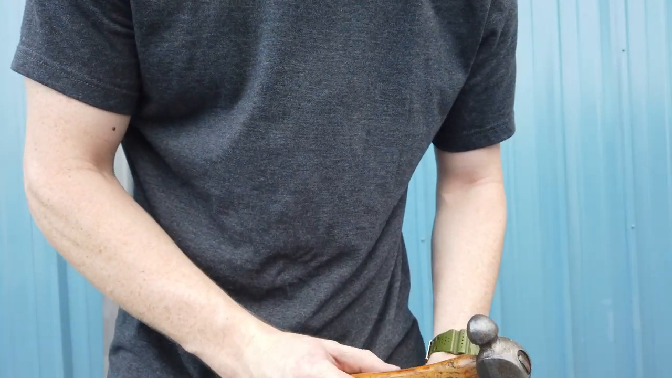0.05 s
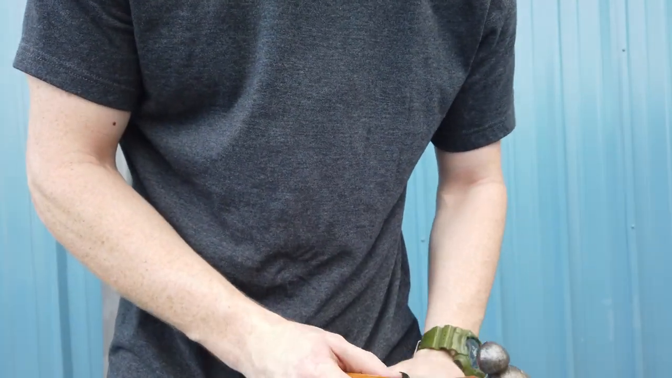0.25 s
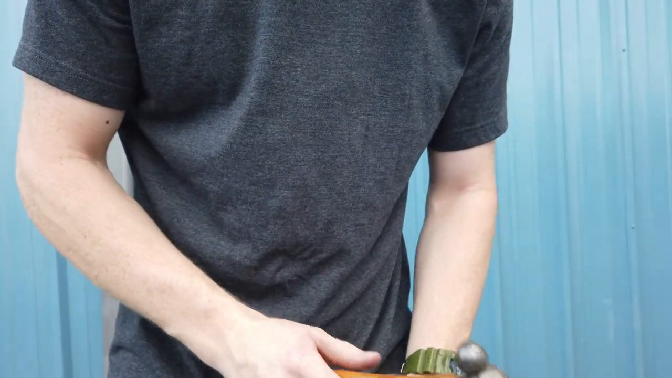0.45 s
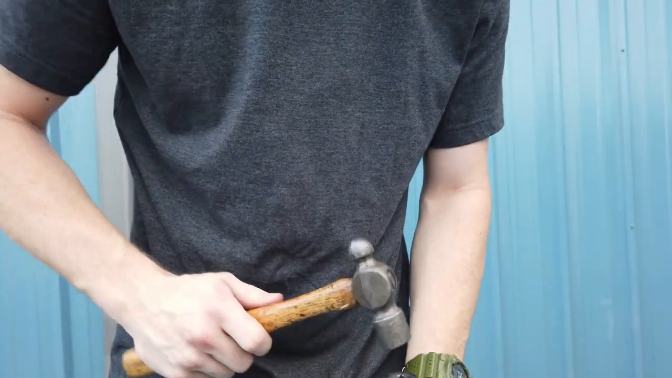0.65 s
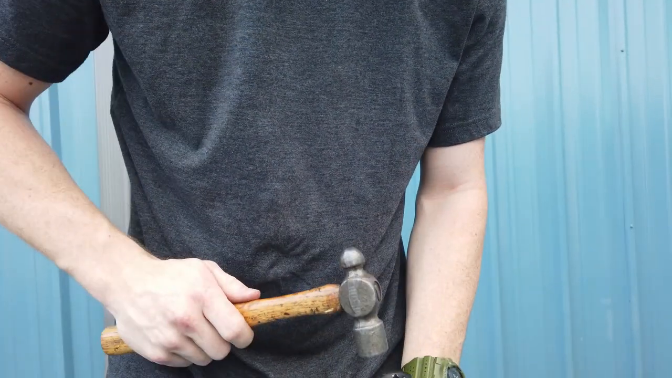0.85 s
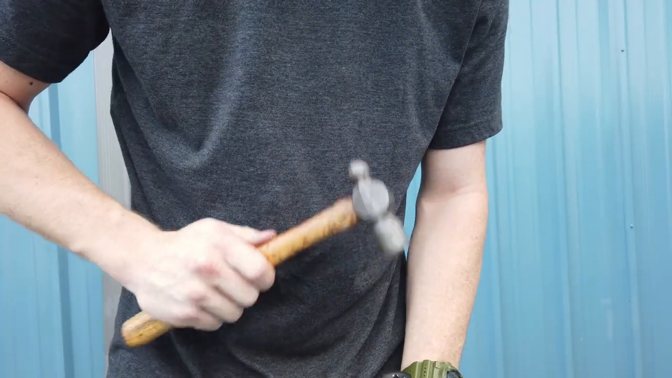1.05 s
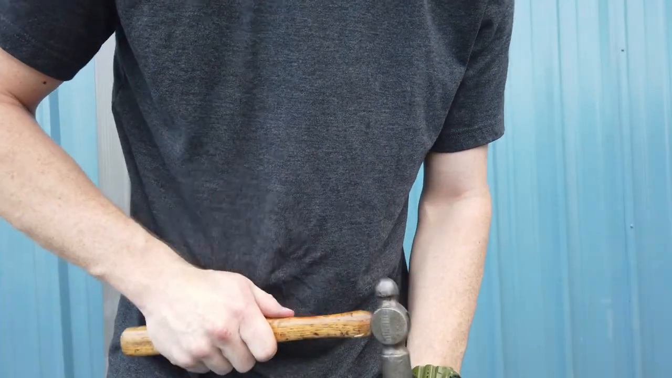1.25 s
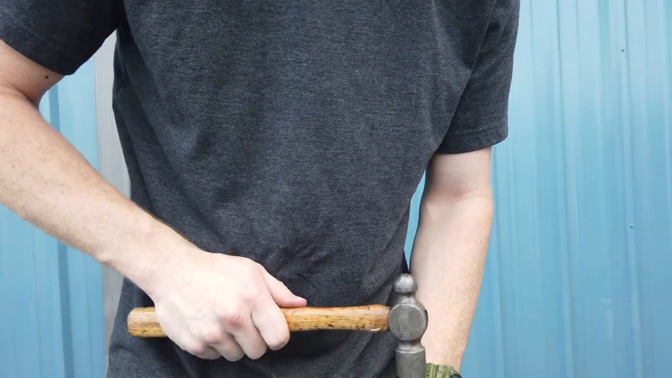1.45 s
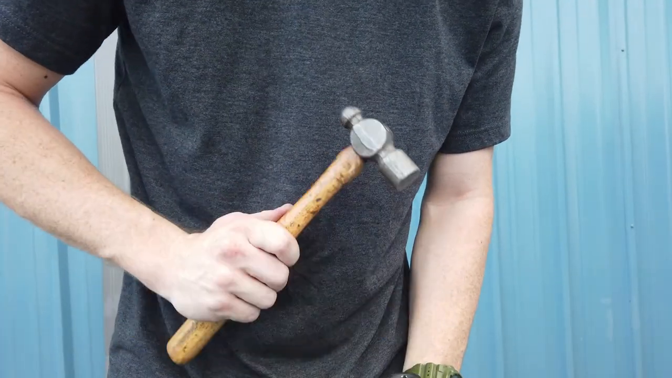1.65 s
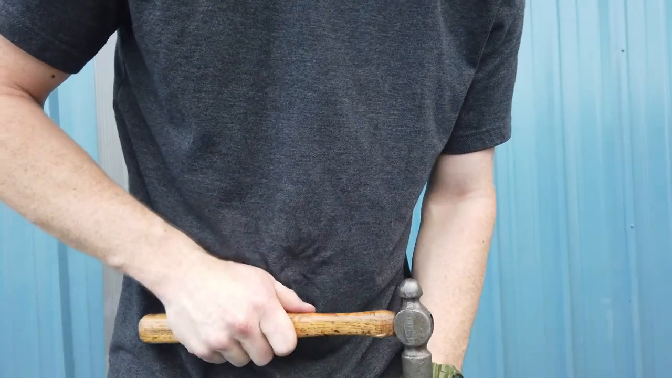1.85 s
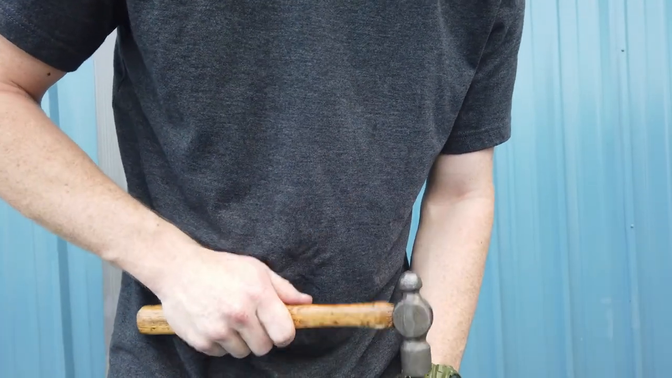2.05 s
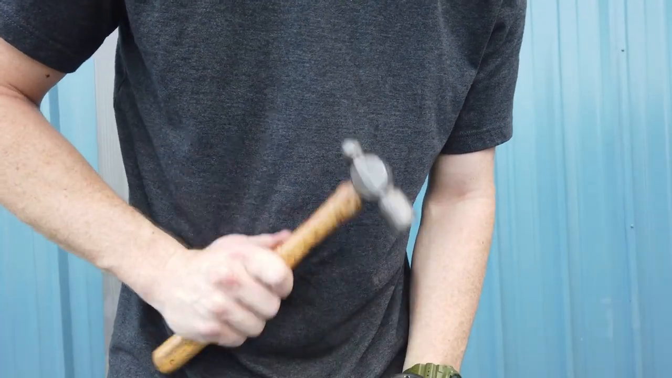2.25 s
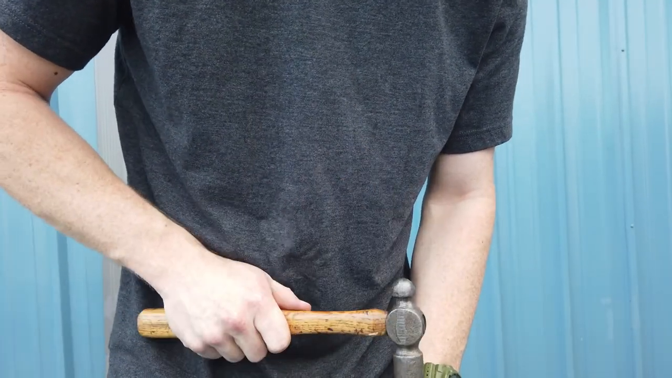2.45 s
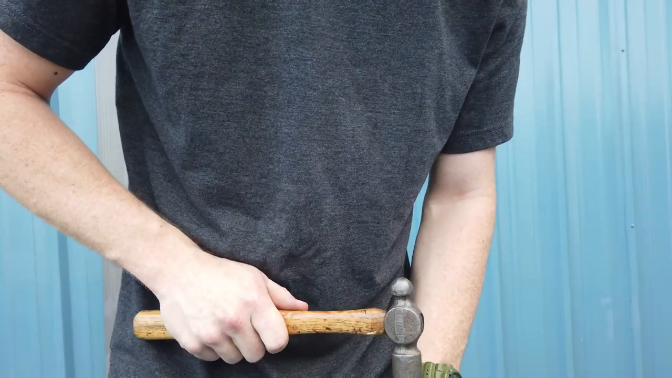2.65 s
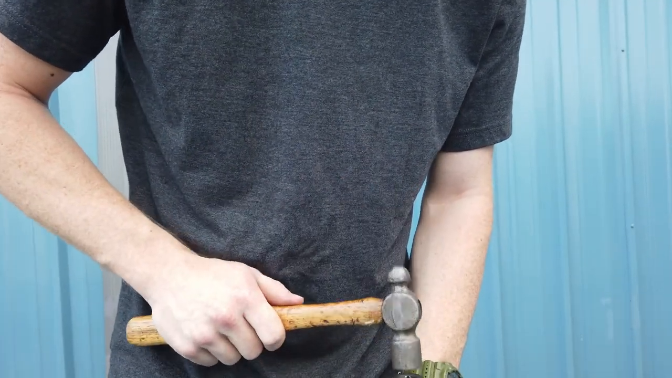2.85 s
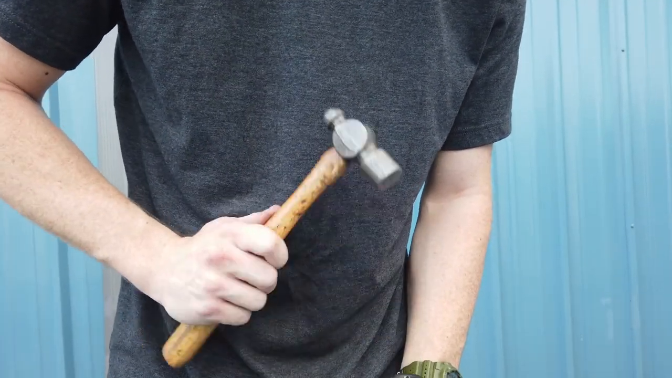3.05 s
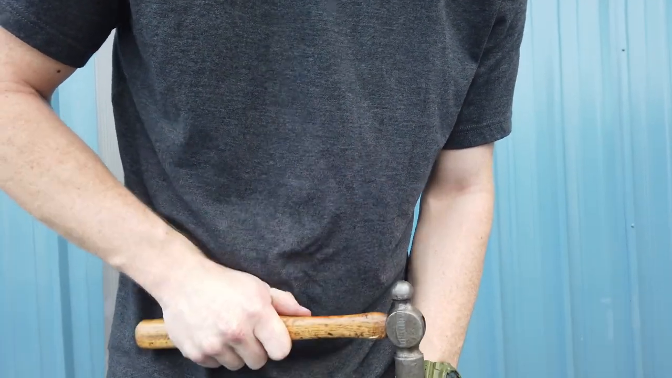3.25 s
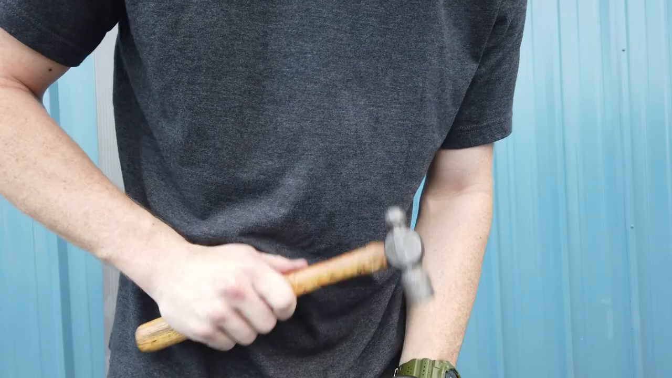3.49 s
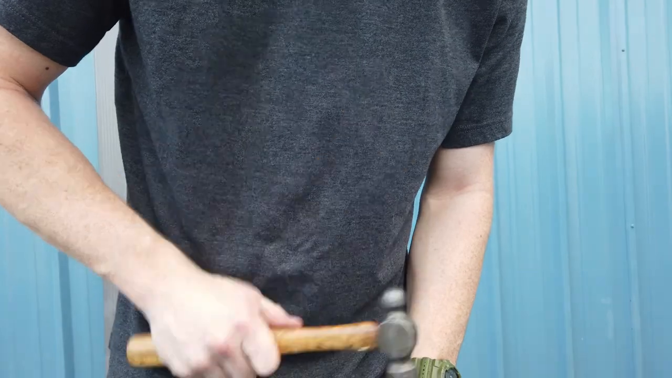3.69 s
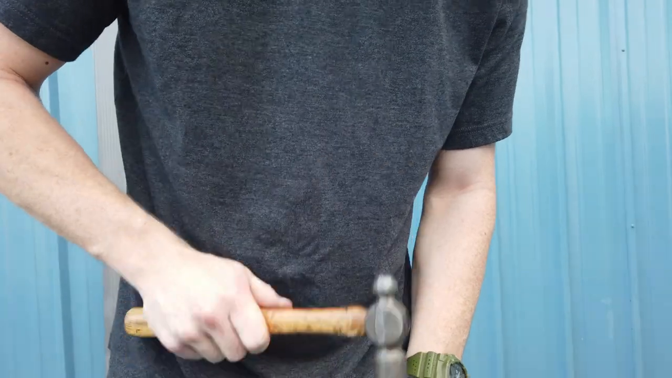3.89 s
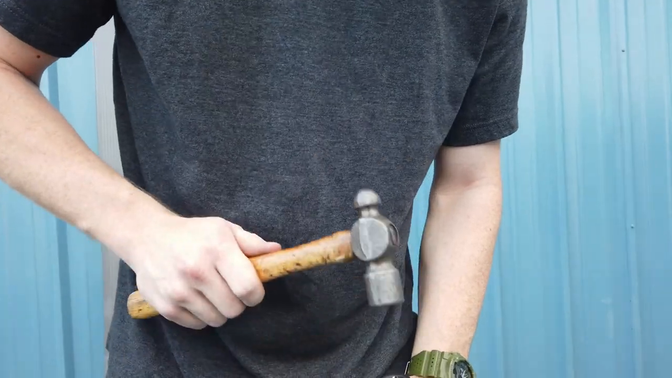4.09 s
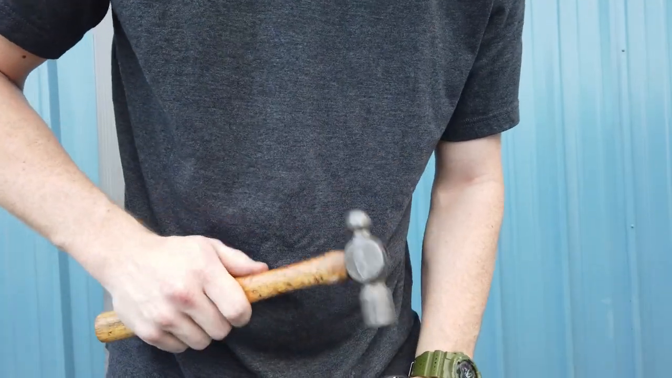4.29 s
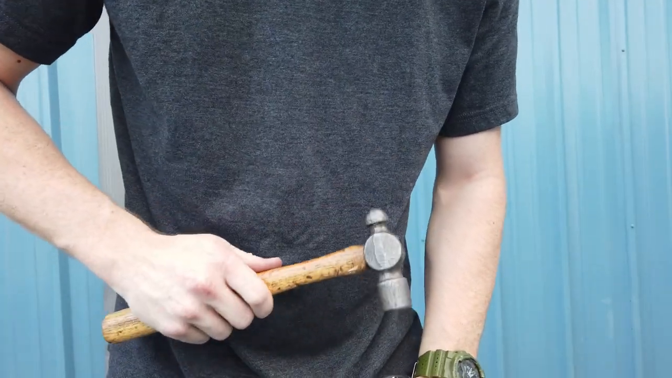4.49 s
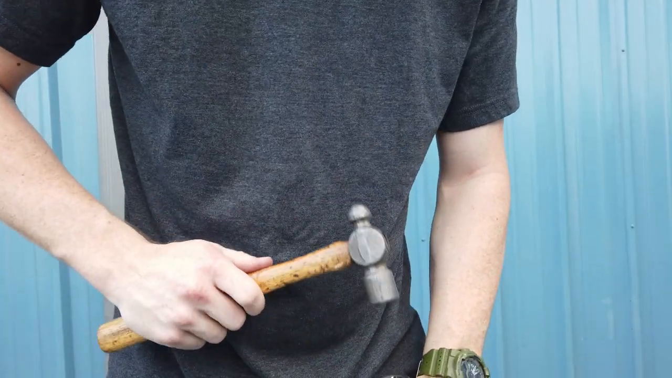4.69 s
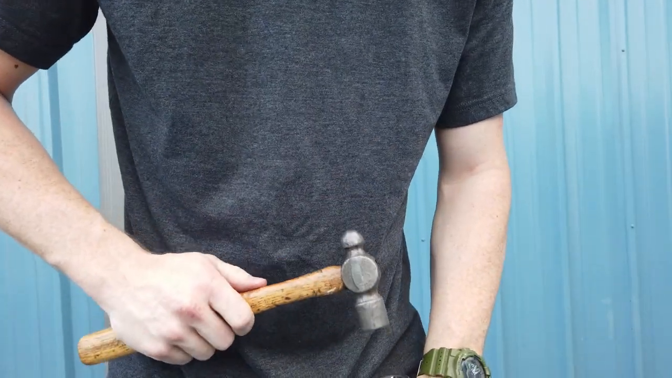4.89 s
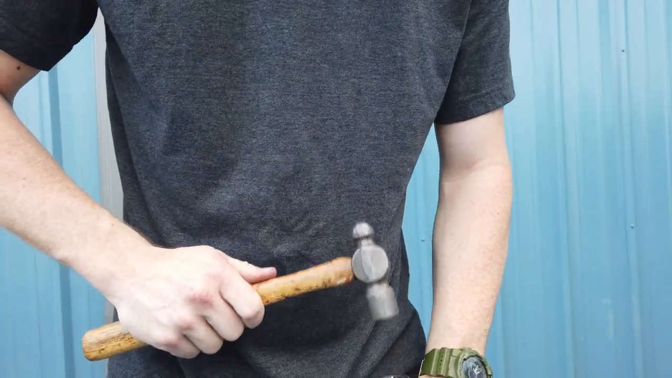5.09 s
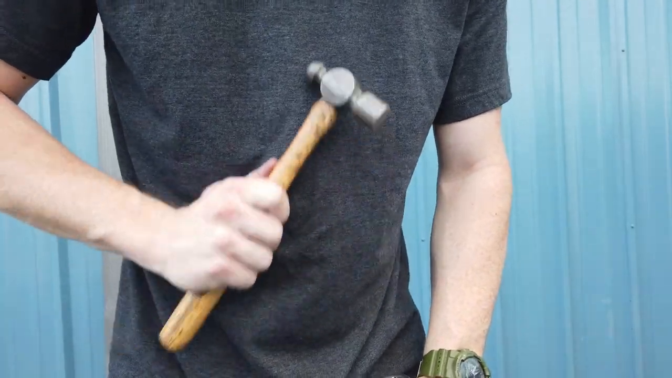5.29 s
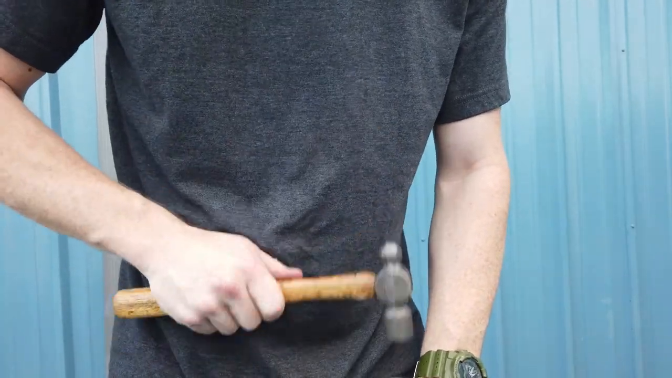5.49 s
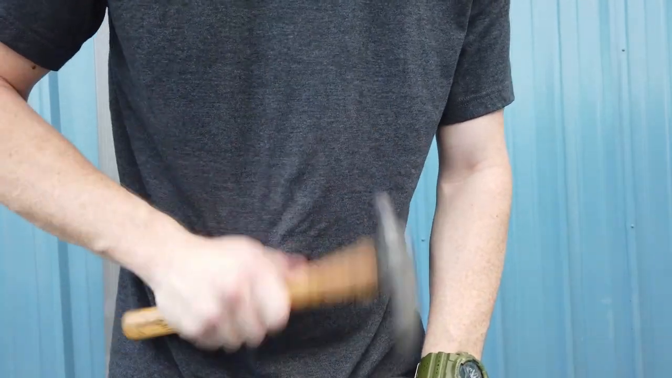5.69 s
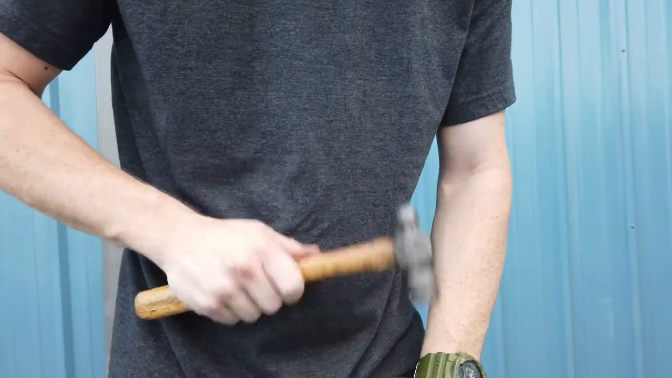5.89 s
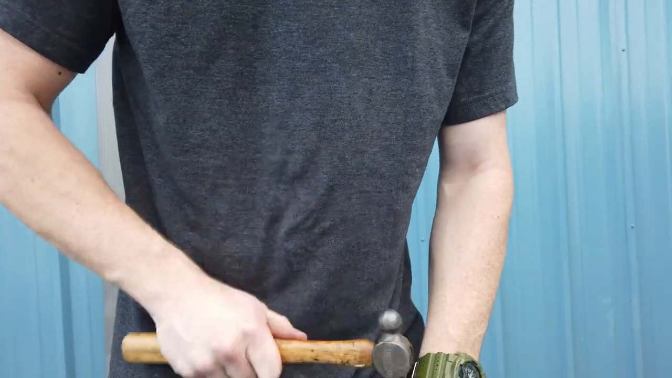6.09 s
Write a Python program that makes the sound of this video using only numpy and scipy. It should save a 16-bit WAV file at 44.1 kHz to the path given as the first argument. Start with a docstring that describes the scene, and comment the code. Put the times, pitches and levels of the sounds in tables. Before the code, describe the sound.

Small tools clink softly on a workbench, then a hammer hits a steel socket seven times, about half a second apart in three quick groups. Every bright, ringing strike makes the socket bounce and the wooden bench thump, with loose metal clattering and jingling for a moment. It is heard from nearby in a small shed with a short echo, while low electrical hum and distant outdoor rumble fill the gaps.

```python
"""A ball hammer drives a socket into a steel part on a loose bench in a metal shed.
Each of the seven blows clicks, sets the socket and hammer head ringing, and makes the socket bounce.
The bench then jumps, booms and rattles its loose parts for about a quarter second.
Small tools clink faintly before the first blow, and the walls add a short echo to tools and hammer.
Mains hum, far outdoor rumble, hiss and a thin chirr fill the pauses."""
import sys
import numpy as np
from scipy import signal
from scipy.fft import rfft, irfft, next_fast_len
from scipy.io import wavfile
from scipy.ndimage import uniform_filter1d, map_coordinates

SR = 44100
rng = np.random.default_rng(int(sys.argv[2]) if len(sys.argv) > 2 else 0)


def to_wav(sig):
    """Store sig (one row per channel, or 1-D mono) as 16-bit WAV at the path in sys.argv[1].

    Samples outside -1..1 are clipped; the rate is SR.
    """
    pcm = np.clip(np.atleast_2d(sig), -1, 1) * 32767
    pcm = np.round(pcm).astype(np.int16)
    wavfile.write(sys.argv[1], SR, pcm.T)  # frames by channels


N = 270774

# Hammer blows. Each row: start in seconds, level in dB, extra dB for the socket ring, the head ring
# and the thud, then the fade time in seconds set by the grip. A fade time is how long a 60 dB drop takes.
BLOWS = [(1.377, -10, -16.5, -24, -14.5, 0.03), (1.9145, -15.5, -12.5, -16, -4, 0.11),
         (2.457, -9.5, -16.5, -22.5, -5, 0.13), (3.305, -12, -15.5, -14, -3, 0.06),
         (3.843, -10, -11, -14.5, -9.5, 0.07), (5.509, -13.5, -19.5, -15.5, -10, 0.066),
         (5.861, -12.5, -25, -20.5, -14, 0.27)]
# The socket bouncing on the steel. Each row: start in seconds, level in dB, extra dB for the socket
# ring and the thud, then the fade time in seconds set by the grip.
BOUNCES = [(1.417, -19.5, -10, -1.5, .12), (1.4457, -30, 1, 4.5, .15), (1.9467, -29.5, -5, 7.5, .12),
           (1.9775, -29.5, -11, 0, .12), (2.1147, -39.5, -12.5, -3, .12), (2.4972, -27.5, -18.5, -7.5, .2),
           (2.5291, -29, -16.5, -1, 0.13), (2.5977, -49, -22.5, 9.5, .1), (3.347, -23, -31.5, 6, .1),
           (3.383, -34.5, -25, 8.5, .1), (3.8795, -25.5, -7.5, -2, .15), (3.902, -23.5, -23.5, 7.5, .15),
           (4.0064, -38.5, -34.5, 13.5, .15), (4.0419, -26, -36, -2, .1), (5.5297, -26, 0.5, -3, .3),
           (5.7162, -40.5, -30, -1, .15), (5.8898, -19, -5, -20, .25), (6.065, -40, -14, -5, .15)]
# The socket's tones. Each row: pitch in Hz, relative level in dB, share of SOCKET_FADE_S.
SOCKET_TONES = [(11040, -11.5, 0.59), (11200, 0, 3.2), (13800, -19.5, .4)]
# The hammer head's tones. Each row: pitch in Hz, relative level in dB, fade time in seconds
# before HEAD_FADE_SCALE shortens it.
HEAD_TONES = [(8430, -16.5, 0.073), (12020, -1, 0.19), (14700, -26, .2)]
# The tone colour of the click. Each row: frequency in Hz, gain in dB.
CLICK_COLOUR = [(500, -1.5), (2000, -5.5), (4000, 3), (9000, -3), (14000, -5), (17000, -15)]
# Resonances of the hand-damped steel part, then of free tools that ring on.
# Each row: pitch in Hz, width in Hz (narrow ones ring longer), gain in dB.
STEEL_TONES = [(3140, 150, 1.5), (5200, 180, 9), (6150, 33, 8.5), (8150, 150, 4)]
FREE_TOOL_TONES = [(2250, 1.5, 11), (4600, 4, 10), (10110, 3, 10), (10145, 3, 8), (12400, 5, 14)]

# Jolts of the bench by a blow, a landing leg or a hand. Each row: start in seconds, level in dB,
# extra dB for the boom, the loose parts and the small hardware, then seconds before it starts to fade.
JOLTS = [(0.001, -50, 4, -7.5, -19, 0.0033), (0.168, -44.5, -2.5, -20, -49, 0.01),
         (0.84, -38, -2, -10, -56.5, 0.005), (1.382, -25, -2.5, 1.5, 2, 0.05),
         (1.418, -25, -6, 4, 3.5, 0.013), (1.47, -38.5, 6, 12, 10, 0.018), (1.542, -45, 5, -3, -2, 0.017),
         (1.745, -51.5, 0.5, -8.5, -41, 0.0038), (1.916, -24.5, -6, 1, 3, 0.063),
         (1.99, -44, 1, 14, 14.5, 0.019), (2.108, -54, -1, 7.5, 9, 0.0043),
         (2.201, -52, -5, -39, -37, 0.016), (2.459, -23, -3, 0, -0.5, 0.045),
         (2.519, -32.5, -9, 3.5, 1.5, 0.038), (2.59, -39, 3, 1, -5, 0.028),
         (2.65, -47, -2.5, -16, -7, 0.0083), (2.782, -62, 1, -3.5, 2.5, 0.028),
         (2.89, -61, -2.5, -16, -25, .01), (3.304, -23, -1.5, 2.5, 2, 0.046),
         (3.37, -34.5, -9.5, 11, 8, 0.026), (3.5, -38.5, -2, -9.5, -35.5, 0.01),
         (3.595, -53, -1.5, -9.5, -33, .01), (3.846, -28.5, -2, 6, 7, 0.089),
         (3.893, -27, -6, 9.5, 1.5, 0.013), (3.96, -37, -5, 7.5, 6, 0.015), (4.002, -39, -6, 16, 3, 0.01),
         (4.038, -46, 6, 12.5, 9, 0.0054), (4.1, -41, 0, -3.5, -16, 0.026),
         (4.2, -45, -3, -8.5, -52, 0.041), (4.28, -41.5, -13, -21.5, -46, 0.013),
         (5.512, -24.5, -5.5, 0.5, -3, 0.046), (5.568, -30, -1, 8, 5.5, 0.033),
         (5.658, -35, -16, 0.5, -0.5, 0.01), (5.713, -58.5, 20, 13.5, 16, 0.0071),
         (5.864, -25.5, -3, 0.5, 3, 0.045), (5.908, -32, -10, 7, 7, 0.037), (6.018, -38.5, 1, 0, 1.5, 0.01),
         (6.064, -42.5, -8, 5.5, 1, 0.016)]
# How the top, legs, heavy parts, light parts and small hardware answer a jolt. Each row: extra level
# in dB, rise time in seconds for a long jolt, fall in dB per second, relative level of a slow tail
# in dB, the tail's fall in dB per second.
BENCH_PARTS = [(-1.5, 0.01, 170.5, -12, 57), (-1, .018, 120, -8.5, 46.5), (-3.5, 0.012, 188.5, -19, 72),
               (-8, .008, 248.5, -39.5, 110.5), (-14, .003, 319.5, -65.5, 122)]
# Resonances of the wooden top, then the legs. Each row: pitch in Hz, width in Hz, relative level in dB.
TOP_TONES = [(164.2, 27, 0), (216.4, 59, 0), (257.2, 48, 0), (312, 17, -4.5)]
LEG_TONES = [(32.2, 5.6, -9), (76, 7.7, -4), (124, 40, -15.5)]
# Tone colours of the heavy parts, light parts and small hardware.
# Each row: frequency in Hz, relative level in dB.
CLATTER_COLOUR = [(200, -27), (350, 0), (800, -4), (1200, -7.5), (2000, -25), (4000, -56)]
RATTLE_COLOUR = [(500, -26.5), (1200, 2.5), (2700, 1), (3500, -10), (4500, -23.5), (7000, -73)]
JINGLE_COLOUR = [(1940, -31), (3300, -6), (4350, -7.5), (7210, -10.5), (10900, -9.5), (15600, -30.5),
                 (16200, -27.5), (16500, -49.5)]
# Resonances of metal sheets and tools in the rattle. Each row: pitch in Hz, width in Hz, strength in dB.
PANEL_TONES = [(385.8, 30, -3), (475.7, 17, 4.5), (630, 27, -6.5), (860, 26, -1), (1243, 38, -8.5),
               (1565, 32, -2), (2350, 10, 1), (3174, 17, 7.5), (6270, 40, 2.5), (8460, 31, 9.5),
               (10100, 24, 6), (10740, 68, 7)]

# Small tools being touched. Each row: start in seconds, level in dB, pitch in Hz, fade time in seconds.
TOOL_TOUCHES = [(0.724, -68, 4120, 0.14), (.78, -52, 686, 0.12), (0.781, -58, 2350, 0.15),
                (1.031, -72, 4160, .1)]
# The shed's echo. Each row: frequency in Hz, fade time in seconds.
ECHO_FADES = [(100, 0.17), (1000, 0.46), (4000, .2), (12000, .14)]
# How alike left and right sound. Each row: frequency in Hz, likeness (1 means the same).
STEREO_LIKENESS = [(30, 0.98), (100, 1), (250, 0.99), (500, .91), (1000, 0.93), (2000, 0.78), (5000, 0.2),
                   (12000, 0.62)]
# The background noise over time. Each row: time in seconds, rumble level in dB, hiss level in dB.
AIR_LEVELS = [(0, -59.5, -73), (1.3, -56.5, -69), (3.2, -53, -78), (4.6, -57.5, -77.5), (5.1, -64.5, -77.5),
              (6.14, -65, -62)]
# Tone colours of the rumble and the hiss. Each row: frequency in Hz, relative level in dB.
RUMBLE_COLOUR = [(12, -32), (20, -3), (86, -9), (103, -13.5), (124, -5.5), (150, -16.5), (300, -30),
                 (390, -66), (660, -120)]
HISS_COLOUR = [(150, -38), (250, -6.5), (566, -7.5), (748, -6), (906, -4), (2020, -9.5), (3980, -19.5),
               (6590, -29), (8120, -23.5), (16000, -37)]
# The mains hum, then the chirr, over time. Each row: time in seconds, level in dB.
HUM_LEVELS = [(0, -56), (1.3, -53.5), (3.2, -63.5), (4.7, -64), (6.14, -58)]
CHIRR_LEVELS = [(0, -90), (.75, -91), (.85, -85), (1.35, -88), (1.5, -100), (6.14, -100)]
# The chirr's two bands. Each row: pitch in Hz, width in Hz, relative level in dB.
CHIRR_TONES = [(4400, 29, 3.5), (8200, 330, -9)]

SOCKET_FADE_S, HEAD_FADE_SCALE = 0.29, 0.78
UNGRIPPED_DB = -34  # the faint share of the socket's ring that escapes the grip
BOUNCE_HEAD_DB = -28  # the head rings only weakly on a bounce
LONG_JOLT_S = 0.017  # a jolt briefer than this also starts more suddenly
HUM_HZ, WOOD_CUTOFF_HZ = 119, 1800
TREBLE_LIMIT_HZ, TREBLE_SLOPE_HZ = 16700, 900


def hammer():
    """Steel hits steel: a sharp click with a dull thud, and the ring of the socket and hammer head."""
    crack, thud, ring = np.zeros((2, N + SR)), np.zeros(N + SR), np.zeros((2, N + SR))
    t = np.arange(SR // 4) / SR
    bounces = [(s, db, socket, BOUNCE_HEAD_DB, low, fade) for s, db, socket, low, fade in BOUNCES]
    for start_s, db, socket_db, head_db, thud_db, grip_fade_s in BLOWS + bounces:
        start = round(start_s * SR)
        span = slice(start, start + len(t))
        noise = rng.standard_normal((4, len(t)))
        crack_fade = amp(-60 * t / 0.008) + 0.2 * amp(-60 * t / 0.045)
        crack[:, span] += amp(db - 10) * noise[2:] * crack_fade
        thud[span] += amp(db + thud_db - 1.2 - 60 * t / 0.015) * noise[1]
        thud[start] -= amp(db + thud_db + 15.5)  # one push of air
        # The grip damps the ring unevenly.
        flutter = amp(-8 * np.abs(normalise(uniform_filter1d(noise[0], size=450))))
        grip = amp(-60 * t / grip_fade_s) + amp(UNGRIPPED_DB)
        socket = amp(socket_db) * grip * ringing(SOCKET_TONES, t, SOCKET_FADE_S)
        head = amp(head_db) * ringing(HEAD_TONES, t, HEAD_FADE_SCALE)
        attack = 1 - np.exp(-t / 0.00068)
        ring[:, span] += amp(db + 6) * (socket + head) * flutter * attack
    dull_thud = signal.lfilter(*signal.butter(1, [0.02, 0.16], "band"), thud[:N])
    steel = lambda hz: (amp(read_at(CLICK_COLOUR, hz)) + resonances(STEEL_TONES)(hz)
                        + resonances(FREE_TOOL_TONES)(hz))
    return spread(crack[:, :N], steel) + dull_thud, ring[:, :N]


def ringing(tones, t, fade_scale):
    """Struck metal rings in fading tones, a little different each time and out of step left and right."""
    chance = rng.standard_normal((len(tones), 2))
    skew = 0.64 * np.array([[1], [-1]])
    out = 0
    for (strength, phase), (hz, db, fade) in zip(chance, tones):
        level = amp(db + 1.5 * strength - 60 * t / (fade * fade_scale))
        out += level * np.sin(2 * np.pi * hz * t + skew * phase)
    return out


def bench():
    """The jolted bench thumps and booms while loose parts clatter, rattle and jingle on it."""
    thump, boom, clatter, rattle, jingle = shaking()
    hops = wobble(45)  # the bench bounces unevenly on its legs
    top = stereo(knocks(250, scatter_db=3, noise_share=0.7), wood(TOP_TONES))
    out = thump * amp(0.37 * hops) * top
    out += boom * stereo(rng.standard_normal((2, N)), wood(LEG_TONES))
    heavy = stereo(knocks(500, scatter_db=2.5, noise_share=0.83), loose_metal(CLATTER_COLOUR))
    out += clatter * amp(0.78 * hops) * heavy
    rattle *= amp(1.2 * hops + wobble(70))
    out += rattle * stereo(knocks(1200, scatter_db=5, noise_share=1.3), loose_metal(RATTLE_COLOUR))
    jingle *= amp(1.8 * hops + 1.2 * wobble(60))
    out += jingle * stereo(knocks(3000, scatter_db=4, noise_share=4.6), loose_metal(JINGLE_COLOUR))
    return out


def shaking():
    """How hard each bench part shakes: every jolt rises, holds, then dies away with a slow tail."""
    power, t = np.zeros((len(BENCH_PARTS), N + SR)), np.arange(SR) / SR
    part_db, rise_s, fall, tail_db, tail_fall = np.transpose(BENCH_PARTS)[..., None]
    for start_s, db, boom_db, loose_db, small_db, hold_s in JOLTS:
        # A knock that leaves the small hardware still goes more into the heavy parts.
        heavy_db = 0.64 * loose_db - 0.08 * small_db
        mix_db = np.array([[0, boom_db, heavy_db, loose_db, small_db]]).T
        attack = 1 - np.exp(-t / (rise_s * np.clip(hold_s / LONG_JOLT_S, 0.15, 1)))
        fading_s = np.clip(t - hold_s, 0, None)
        fade = amp(-fall * fading_s) + amp(tail_db - tail_fall * fading_s)
        start = round(start_s * SR)
        power[:, start:start + SR] += (amp(db + part_db + mix_db) * attack * fade) ** 2
    return np.sqrt(power[:, :N])


def knocks(per_second, scatter_db, noise_share):
    """Two streams of tiny impacts of random size, blended with smooth noise."""
    hits = rng.random((2, N)) < per_second / SR
    sizes = amp(scatter_db * rng.standard_normal((2, N))) * np.sign(rng.standard_normal((2, N)))
    return normalise(hits * sizes) + noise_share * rng.standard_normal((2, N))


def wood(tones):
    """A filter for wood, which resonates low down and gives little treble."""
    return lambda hz: resonances(tones)(hz) / (1 + 1j * hz / WOOD_CUTOFF_HZ) ** 2


def loose_metal(points):
    """A filter for loose parts: a broad tone colour with peaks where sheets and tools resonate."""
    peaks = lambda hz: sum(amp(db) / (1 + (2 * (hz - pitch) / width) ** 2)
                           for pitch, width, db in PANEL_TONES)
    return lambda hz: colour(points)(hz) * (1 + peaks(hz))


def small_tools():
    """Small tools slid on the bench give faint, rough rings."""
    out, t = np.zeros(N), np.arange(SR // 4) / SR
    for start_s, db, hz, fade_s in TOOL_TOUCHES:
        noise = uniform_filter1d(rng.standard_normal(len(t)), size=120)
        scrape = normalise(uniform_filter1d(noise, size=120))
        level = amp(db - 60 * t / fade_s) * (1 - np.exp(-t / 0.0015))
        start = round(start_s * SR)
        out[start:start + len(t)] += level * scrape * np.sin(2 * np.pi * hz * t)
    return out


def shed_echo(sound):
    """The walls throw the sound back, and each frequency dies away at its own speed."""
    hz, t, spectrum = signal.stft(rng.standard_normal((2, SR // 2)), SR, nperseg=256)
    spectrum *= amp(-60 * t / read_at(ECHO_FADES, hz)[:, None])
    shared, side = spectrum * stereo_shares(hz[:, None])
    tail = signal.istft(np.array([shared + side, shared - side]), SR, nperseg=256)[1]
    delayed = np.pad(sound, (200, 0))[None]
    return signal.fftconvolve(delayed, tail / np.linalg.norm(tail[0]), axes=1)[:, :N]


def outdoor_air():
    """Far rumble and soft hiss, each drifting in level."""
    rumble_db, hiss_db = over_time(AIR_LEVELS)
    rumble = amp(rumble_db + 0.5 * wobble(7.3)) * stereo_noise(colour(RUMBLE_COLOUR))
    hiss = amp(hiss_db + 0.43 * wobble(11)) * stereo_noise(colour(HISS_COLOUR))
    return rumble + hiss


def mains_hum():
    """Mains power hums on one low, wavering tone."""
    level = amp(over_time(HUM_LEVELS)[0] + 1.5 * wobble(8))
    return level * np.sin(2 * np.pi * HUM_HZ * np.arange(N) / SR + 0.47 * wobble(15))


def chirr():
    """A thin, far chirr of high noise, perhaps an insect outside."""
    level = amp(over_time(CHIRR_LEVELS)[0] + 1.5 * wobble(25))
    return level * stereo_noise(resonances(CHIRR_TONES))


def amp(db):
    """Turn a level in dB into a number to multiply by."""
    return 10 ** (np.asarray(db) / 20)


def normalise(sound):
    """Scale a sound to an average power of 1."""
    return sound / np.sqrt(np.mean(sound ** 2) + 1e-20)


def read_at(points, hz):
    """Read between the rows of a frequency table, on a logarithmic frequency scale."""
    frequencies, values = np.transpose(points)
    return np.interp(np.log(hz + 1), np.log(frequencies + 1), values)


def over_time(rows):
    """Join a table's timed rows with straight lines: one curve for each level column."""
    times, *columns = np.transpose(rows)
    return [np.interp(np.arange(N) / SR, times, column) for column in columns]


def wobble(per_second):
    """A smooth curve through this many random points a second."""
    points = rng.standard_normal(int(N * per_second / SR) + 4)
    return map_coordinates(points, [np.arange(N) * per_second / SR])


def colour(points):
    """A filter that follows a tone colour table."""
    return lambda hz: amp(read_at(points, hz))


def resonances(tones):
    """A filter that rings at each listed pitch; every second resonance is flipped in sign."""
    return lambda hz: sum((-1) ** k * amp(db) * 1j * hz * width / (pitch**2 - hz**2 + 1j * hz * width)
                          for k, (pitch, width, db) in enumerate(tones))


def filtered(sound, response):
    """Apply a filter, given as a function of frequency in Hz."""
    size = next_fast_len(N + SR // 2)
    hz = np.fft.rfftfreq(size, 1 / SR)
    return irfft(rfft(sound, size) * response(hz), size)[..., :N]


def stereo_shares(hz):
    """How much of each frequency left and right share, and how much sets them apart."""
    angle = np.arccos(np.clip(read_at(STEREO_LIKENESS, hz), -1, 1)) / 2
    return np.array([np.cos(angle), np.sin(angle)])


def spread(pair, response):
    """Filter two unrelated signals and mix them into left and right, alike in the bass."""
    shared, side = filtered(pair, lambda hz: response(hz) * stereo_shares(hz))
    return np.array([shared + side, shared - side])


def stereo(pair, response):
    """Filter and spread a pair of signals, then bring it to an average power of 1."""
    return normalise(spread(pair, response))


def stereo_noise(response):
    """Filtered stereo noise with an average power of 1."""
    return stereo(rng.standard_normal((2, N)), response)


def scene():
    """Mix the hammer and tools, their echo, the bench and the background."""
    clicks, ring = hammer()
    contacts = clicks + small_tools()
    echo = shed_echo((amp(-4) * contacts + amp(-8.5) * ring).mean(axis=0))
    return contacts + ring + echo + bench() + outdoor_air() + mains_hum() + chirr()


def record(dry):
    """The highest treble slopes away to silence at the treble limit."""
    return filtered(dry, lambda hz: np.clip((TREBLE_LIMIT_HZ - hz) / TREBLE_SLOPE_HZ, 0, 1) ** 2)


dry = scene()
out = record(dry)
to_wav(out)
```